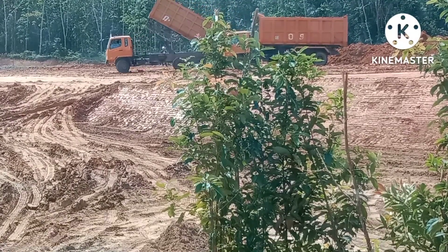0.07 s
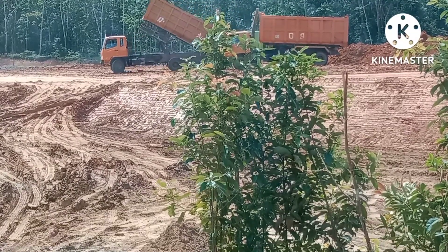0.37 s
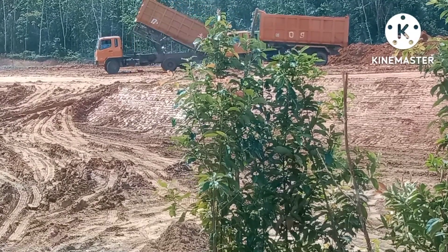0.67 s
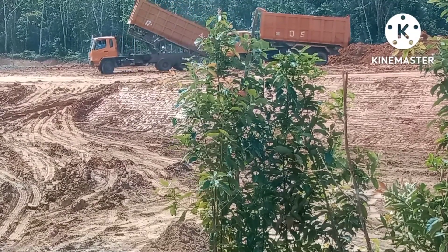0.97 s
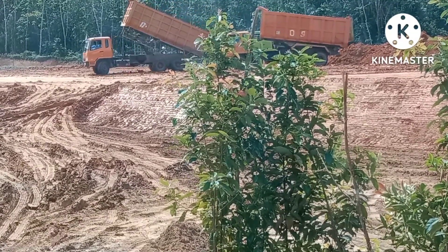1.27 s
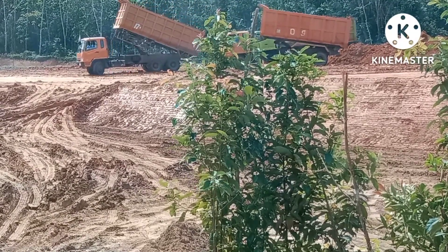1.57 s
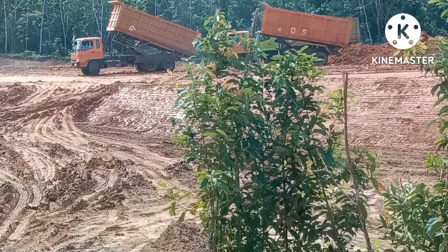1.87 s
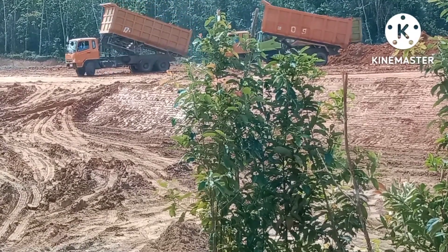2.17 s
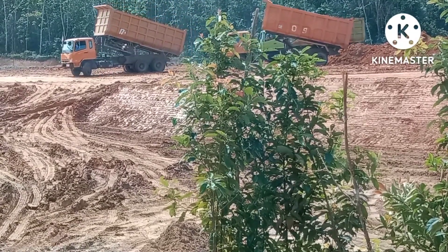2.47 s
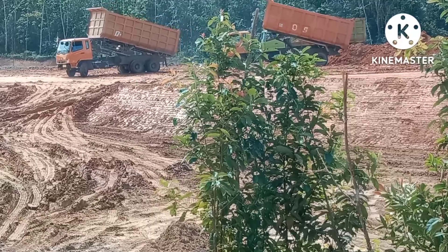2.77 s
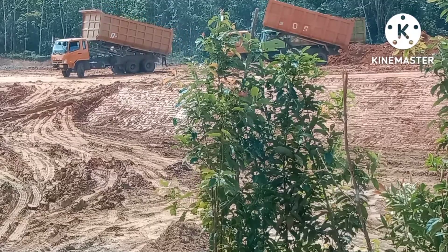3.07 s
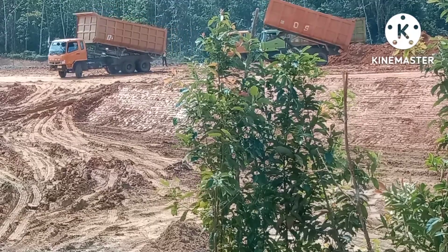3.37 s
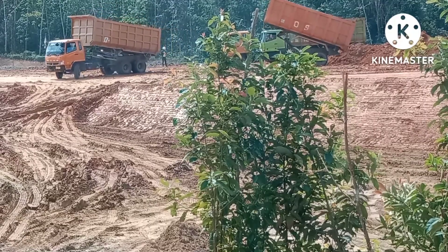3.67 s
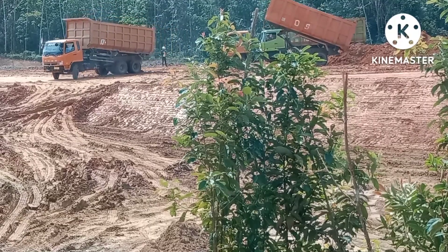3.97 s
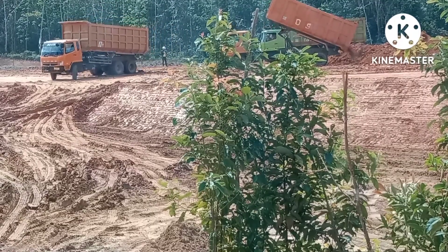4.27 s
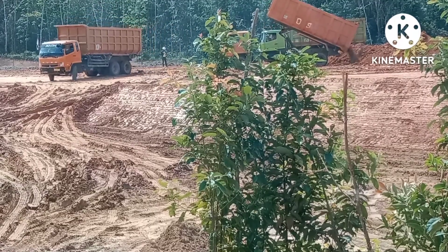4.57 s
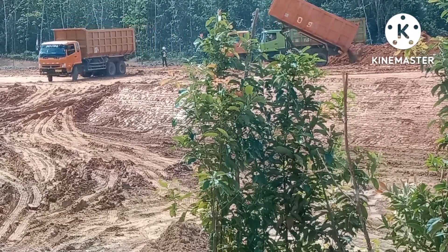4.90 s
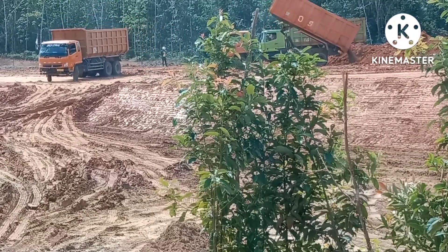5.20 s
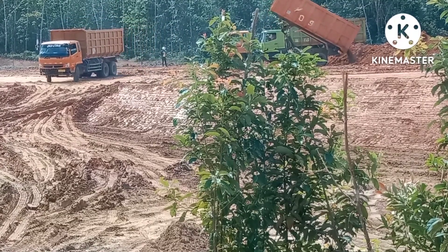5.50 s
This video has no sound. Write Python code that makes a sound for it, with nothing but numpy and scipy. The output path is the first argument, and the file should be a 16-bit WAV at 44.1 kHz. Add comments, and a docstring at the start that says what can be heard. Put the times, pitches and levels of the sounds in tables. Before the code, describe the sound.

Two diesel dump trucks are heard from a distance across an open earthwork site. From the start, one holds high revs to lift its bed, with a steady knocking drone and a gently pulsing pump whine. The other rolls along with a low rumble and a booming exhaust that throbs unevenly. Dull thuds of wheels in ruts come between about 1.3 and 3.7 seconds, and faint high ticks and small steel squeaks show from around 2 seconds. At 3.6 seconds brakes begin to drag with a thin squeal. Just after, the lifting truck's throttle closes and it sinks towards idle, growing quieter with a falling gear whine. From about 4 seconds to the end, near 5.6 seconds, short brake squeals, rubbing and metal squeaks recur over the other truck's continuing rumble. Very faint insects hiss high up throughout, with a brief trill around 2 seconds.

```python
"""Two diesel dump trucks on an earthwork site, heard from across the cut.
From the start one holds high revs to lift its bed, its pump whining amid faint high ticks, while the
other rolls away with a booming exhaust. Insects pulse faintly in the trees. Wheels thud into ruts and
steel squeaks on steel. At 3.6 s brake shoes begin to drag with a thin squeal; just after, the tipping
truck's throttle closes and it drops towards idle, its gear whine falling through the body's resonances."""
import sys
import numpy as np
from scipy import signal
from scipy.fft import rfft, irfft, next_fast_len
from scipy.io import wavfile
from scipy.ndimage import map_coordinates

SR = 44100
rng = np.random.default_rng(int(sys.argv[2]) if len(sys.argv) > 2 else 0)


def to_wav(sig):
    """Store sig (one row per channel, or 1-D mono) as 16-bit WAV at the path in sys.argv[1].

    Samples outside -1..1 are clipped; the rate is SR.
    """
    pcm = np.clip(np.atleast_2d(sig), -1, 1) * 32767
    pcm = np.round(pcm).astype(np.int16)
    wavfile.write(sys.argv[1], SR, pcm.T)  # frames by channels


N = 248724
T = np.arange(N) / SR
THROTTLE_OFF_S, CLOSING_S, COAST_S = 3.72, 0.072, 0.08

# Engine run-down: time_s, cycle_hz
REVS = [(3.79, 15.417), (3.9, 14.68), (4.01, 14.08), (4.13, 13.6), (4.31, 12.9), (4.5, 12.2), (4.9, 11.1),
        (5.2, 10.5), (5.64, 10.2)]
def tipping_truck():
    """One crankshaft drives engine, pump and gears; off throttle they slow and the truck quietens."""
    cycle_hz, = curves(REVS)
    cycles = np.cumsum(cycle_hz) / SR
    slowed = (cycle_hz[0] - cycle_hz) / np.ptp(cycle_hz)  # 0 lifting, 1 near idle
    knock_drop_db = -8 * ramp(THROTTLE_OFF_S, CLOSING_S) - 18.5 * slowed
    lope = undb(1.6 * slowed * np.sin(2 * np.pi * cycles))
    engine = (engine_tones(cycles, slowed, knock_drop_db)
              + lope * exhaust_roar(cycles, slowed)
              + lope * engine_block(cycles)
              + combustion_knock(cycles, knock_drop_db))
    return engine + hydraulic_pump(cycles) + gear_whine(cycles, cycle_hz) + high_ticks(slowed)


# Engine harmonics: cycle_multiple, level_db
HARMONICS = [(6, -32), (8, -34.5), (12, -37.5), (14, -36.5), (16, -32.5), (19, -43.5), (20, -38),
             (22, -45.5), (23, -50.5), (25, -48), (27, -50.5), (29, -52.5), (30, -48), (33, -49.5),
             (35, -52.5), (48, -60), (52, -59), (54, -54), (64, -59), (72, -57.5), (75, -58), (84, -60),
             (88, -57.5), (162, -64), (171, -62), (174, -57.5)]
def engine_tones(cycles, slowed, knock_drop_db):
    """Harmonics of the cycle rate fade with the revs; the high ones also die with the knock."""
    shift_db = -1.5 - 22 * slowed
    return sum(tone(order * cycles, db + shift_db + knock_drop_db * min((order / 50) ** 2, 1))
               for order, db in HARMONICS)


# Exhaust spectrum: freq_hz, gain_db
ROAR_SPECTRUM = [(100, -21.5), (160, 1.5), (220, -3), (260, -1.5), (300, -0.5), (345, -10), (450, -13),
                 (560, -15), (680, -34.5), (900, -38), (1500, -55), (5000, -100)]
def exhaust_roar(cycles, slowed):
    """Uneven firings pulse through the exhaust, softer as the revs fall."""
    pulses = clatter(cycles, repeat=0.18) * firings(cycles, decay=1.6, scatter_db=1.5, lumpy_db=1)
    return colour(pulses, ROAR_SPECTRUM) * undb(-28 - 10 * slowed)


# Block spectrum: freq_hz, gain_db
BLOCK_SPECTRUM = [(400, -21), (620, 3.5), (820, 2.5), (900, 1), (1100, 1), (1400, 0), (1620, -4),
                  (1850, -19), (2300, -37.5), (6000, -85)]
def engine_block(cycles, settle_s=1.28):
    """Near-even firings rattle the block, which settles once the crankshaft slows."""
    pulses = clatter(cycles, repeat=0.32) * firings(cycles, decay=5.2, scatter_db=0, lumpy_db=-0.1)
    return colour(pulses, BLOCK_SPECTRUM) * undb(-42 - 30.5 * ramp(THROTTLE_OFF_S + COAST_S, settle_s))


CYLINDERS_DB, KNOCK_DECAY_STROKES = [7, -2, 4, 3, 5, -4], 0.12
# Cylinder head spectrum: freq_hz, gain_db
KNOCK_SPECTRUM = [(1200, -38), (2020, -18), (2300, 0.5), (2700, 0.5), (3000, -12), (3400, -19.5),
                  (4200, -28.5), (9000, -68.5)]
def combustion_knock(cycles, drop_db, scatter_db=2.5):
    """A sharp blow from each cylinder in turn stands out of the head's constant ringing."""
    ringing = clatter(cycles, repeat=0.3)
    strokes = 6 * cycles
    firing = strokes.astype(int)
    blow_db = np.array(CYLINDERS_DB)[firing % 6] + scatter_db * rng.standard_normal(4096)[firing]
    blows = unit(1 + undb(blow_db) * np.exp(-(strokes % 1) / KNOCK_DECAY_STROKES))
    return colour(ringing * blows, KNOCK_SPECTRUM) * undb(-50 + drop_db)


def hydraulic_pump(cycles, order=26, beat_hz=1.065, beat_peak_s=1.88, fade_db_per_s=40.5):
    """The pump's whine swells about once a second and fades when the throttle closes."""
    beat = np.abs(1 + 0.3 * np.exp(2j * np.pi * beat_hz * (T - beat_peak_s)))
    level_db = -38.5 - fade_db_per_s * np.maximum(T - THROTTLE_OFF_S, 0)
    return beat * tone(order * cycles, level_db, fading_db=1.86)


# Gear tones: cycle_multiple, resonance_hz, level_db
GEAR_TONES = [(10, 140, -26), (11, 152, -27.5), (14, 210, -29), (16, 241, -32), (16, 208, -32),
              (17, 228, -31), (20, 280, -37.5), (24, 295, -38), (26, 384, -33), (26, 286, -37.5),
              (27, 340, -37.5), (32, 460, -39.5), (32, 390, -40.5), (36, 460, -44.5), (36, 400, -44),
              (52, 714, -49.5), (54, 678, -54), (52, 540, -54)]
def gear_whine(cycles, cycle_hz, shudder_hz=9, relative_width=0.034, attack_s=0.029):
    """On the overrun each rough gear tone stands out while it falls through a body resonance."""
    out = 0
    for order, hz, db in GEAR_TONES:
        shudder = np.cumsum(shudder_hz * drift(90)) / SR
        gear = tone(order * cycles + shudder, db, fading_db=-0.2) * unit(undb(2.5 * drift(70)))
        resonance = np.exp(-((order * cycle_hz / hz - 1) / relative_width) ** 2)
        out += gear * resonance
    return out * ramp(THROTTLE_OFF_S + COAST_S, attack_s)


# Tick pitches: ring_hz, level_db
TICK_RINGS = [(3050, -73.5), (3160, -70.5), (3240, -70.5), (3500, -76.5), (3700, -79), (3800, -80),
              (4200, -83.5), (4430, -82)]
def high_ticks(slowed, ticks_per_s=36, ring_s=0.0052, peak_s=2.3, fade_db_per_s=2.5):
    """Faint, quick, random ringing ticks at 3-4.5 kHz swell, then fade, further as the revs fall."""
    t = T[:SR // 10]
    out = 0
    for hz, db in TICK_RINGS:
        ticks = (rng.random(N) < ticks_per_s / SR) * undb(3 * noise())
        ring = t * np.exp(-t / ring_s) * np.sin(2 * np.pi * hz * t)
        out += undb(db) * unit(signal.fftconvolve(ticks, ring)[:N])
    return out * undb(3 - fade_db_per_s * np.abs(T - peak_s) - 14.5 * slowed)


# Rolling truck's engine: time_s, boom_hz, rumble_db, boom_db
DRIVE = [(0, 123.4, -26.5, -32), (.4, 119.6, -30, -34), (.62, 130.8, -26.5, -26.5), (.78, 115, -26.5, -27),
         (.9, 133.1, -30, -35), (1.1, 123, -26, -31), (1.35, 119.8, -25, -31), (1.6, 126.1, -25.5, -31.5),
         (1.95, 118.6, -27.5, -33.5), (2.25, 122, -28.5, -33.5), (2.5, 127, -25.5, -31),
         (3.1, 119, -27.5, -28), (3.5, 119.3, -24, -33), (3.66, 127.6, -23, -27.5),
         (3.75, 115.4, -32, -32.5), (4.05, 131.9, -28, -33.5), (4.18, 120.9, -27.5, -38),
         (4.3, 117, -27.5, -25), (4.4, 131.6, -34, -29), (4.48, 130.5, -30.5, -23.5),
         (4.7, 124.5, -27, -25.5), (4.95, 116.1, -28.5, -29.5), (5.3, 117.1, -28.5, -28.5),
         (5.64, 119, -29.5, -26.5)]
def rolling_truck(wander_hz=1.2, boom_order=10):
    """An engine at wandering revs drives the exhaust boom and the chassis rumble."""
    boom_hz, rumble_db, boom_db = curves(DRIVE)
    waves = np.cumsum(boom_hz + wander_hz * drift(11)) / SR
    cycles = waves / boom_order
    return exhaust_boom(waves, cycles, boom_db) + chassis_rumble(cycles) * undb(rumble_db)


# Exhaust throbs: peak_s, half_length_s, level_db
THROBS = [(0.121, 0.032, -23.5), (0.194, 0.02, -20.5), (.385, 0.012, -16.5), (.775, 0.017, -23),
          (0.897, .02, -20), (1.073, 0.01, -17.5), (1.133, 0.011, -23), (1.34, 0.022, -21),
          (1.64, 0.028, -18), (1.692, .022, -19), (1.844, 0.02, -23.5), (1.934, .018, -24),
          (2.725, 0.031, -20.5), (3.066, .018, -19), (3.133, .02, -22.5), (3.296, 0.021, -18),
          (3.367, 0.014, -25.5), (3.545, 0.021, -22.5), (3.676, .02, -25.5), (3.741, 0.028, -18.5),
          (4.008, 0.02, -21.5), (4.06, .018, -20.5), (4.61, 0.027, -27), (5.49, .02, -27.5)]
def exhaust_boom(waves, cycles, level_db):
    """The boom throbs now and then; the next lower engine order beats with it once a cycle."""
    steady = undb(level_db + drift(22))
    throbs = sum(undb(db) * bump(peak_s, half_s) for peak_s, half_s, db in THROBS)
    boom = np.hypot(steady, throbs) * np.sin(2 * np.pi * waves)
    lower_order = 0.3 * steady * np.sin(2 * np.pi * (waves - cycles))
    return np.sqrt(2) * (boom + lower_order)


# Chassis spectrum: freq_hz, gain_db
RUMBLE_SPECTRUM = [(20, -25), (42, -30), (54, -8), (68, -1), (85, 2.5), (110, 3.5), (135, 4.5), (160, -0.5),
                   (178, -11.5), (215, 2.5), (255, -10), (300, -8), (345, -14), (440, -14.5), (600, -30.5),
                   (1000, -56.5), (4000, -110)]
def chassis_rumble(cycles):
    """Uneven firings shake the chassis."""
    pulses = clatter(cycles, repeat=0.24) * firings(cycles, decay=0.64, scatter_db=1, lumpy_db=-0.5)
    return colour(pulses, RUMBLE_SPECTRUM)


# Chassis thuds: peak_s, pitch_hz, level_db
JOLTS = [(1.31, 85.7, -21), (1.41, 84, -30), (1.7, 83.7, -24), (2.08, 86, -29), (2.96, 81.2, -29),
         (3.55, 92, -24), (3.665, 85, -25.5)]
def rut_jolts(half_s=0.014):
    """Wheels drop into ruts: low thuds, blurred by distance."""
    return sum(tone(hz * T, db, fading_db=-3.9) * bump(peak_s, half_s) for peak_s, hz, db in JOLTS)


# Drum rub spectrum: freq_hz, gain_db
DRUM_SPECTRUM = [(800, -49.5), (1200, -13), (1370, 18.5), (1500, 7), (1620, -4), (1850, -29), (2200, -10),
                 (2480, -18), (2750, -23), (3500, -21.5), (8000, -70.5)]
# Shoe drags: start_s, length_s, rub_db, squeal_over_rub_db
DRAGS = [(3.6, 0.19, -61, 6), (4.178, 0.25, -56.5, 4.5), (4.553, 0.11, -57.5, -13), (4.807, 0.077, -61, 4),
         (4.94, 0.16, -68, 15), (5.133, 0.096, -57, -8), (5.27, 0.13, -59.5, -9), (5.44, 0.22, -64, -9.5)]
def brakes(squeal_hz=1473, groan_hz=1407, attack_s=0.012, release_s=0.069):
    """Dragging shoes rub the drum, which groans unsteadily and at times squeals, with a weak octave."""
    phase = 2 * np.pi * np.cumsum(squeal_hz + 14 * drift(140)) / SR
    squeal = unit((np.sin(phase) + undb(-26.5) * np.sin(2 * phase)) * undb(2 * drift(41)))
    groan_waves = np.cumsum(groan_hz + 53.3 * drift(9.3) + 30 * drift(250)) / SR
    groan = tone(groan_waves, db=-6) * unit(undb(2.5 * drift(90)))
    rub = colour(noise(), DRUM_SPECTRUM) * undb(2 * drift(40))
    out = 0
    for start_s, length_s, db, squeal_db in DRAGS:
        pressure = gate(start_s, length_s, attack_s, release_s)
        out += pressure * undb(db) * (rub + groan + undb(squeal_db) * squeal)
    return out


# Body and spring squeaks: peak_s, half_length_s, pitch_hz, glide_hz_per_s, level_db
SQUEAKS = [(2.0, 0.044, 4140, 5, -69), (2.034, 0.053, 3230, 3, -58.5), (2.095, .04, 3730, 1, -63),
           (2.351, 0.033, 3780, -3, -67), (2.583, .04, 3859, -6.5, -66), (2.62, 0.034, 3566, -0.5, -65),
           (2.7, 0.021, 4450, 0, -73), (2.779, 0.015, 4500, 0, -76), (3.72, 0.021, 3800, 2, -62.5),
           (3.808, 0.02, 3807, 0, -65), (3.81, 0.024, 3220, -5, -63), (3.9, .03, 3760, -5, -77),
           (4.05, 0.028, 1130, 1204, -51), (4.079, 0.039, 2526, 1204, -59), (4.2, 0.044, 2764, 7, -60.5),
           (4.322, 0.037, 3548, -4, -68.5), (4.327, 0.036, 1634, 3, -59), (4.426, 0.038, 2390, 1, -64.5),
           (4.519, 0.029, 3573, 0.5, -71), (4.543, 0.026, 556, 5, -45), (4.668, 0.031, 908, 0.5, -59),
           (4.73, 0.016, 1387, 8002, -54.5), (4.784, 0.043, 1636, -4, -62.5),
           (4.856, .025, 2250, -1500, -67.5), (4.86, 0.017, 587.7, 0.5, -52.5),
           (4.925, 0.048, 4420, 2, -76), (4.989, 0.028, 640, 1, -53), (5.012, .018, 2960, -3, -68),
           (5.041, 0.022, 2440, 798, -60), (5.099, 0.042, 3320, 8, -71.5), (5.109, 0.021, 2560, 2500, -63),
           (5.215, .035, 560, -2, -51), (5.277, .02, 1080, 0, -61), (5.335, .025, 575, -1, -53),
           (5.452, 0.027, 2110, -2, -67.5)]
def steel_squeaks(wobble_hz=28):
    """Steel slips on steel: a rough, narrow ring that swells, slides and stops."""
    wobble = np.cumsum(wobble_hz * drift(250)) / SR
    grain = np.sqrt(2) * unit(undb(2.5 * drift(120)))
    out = 0
    for peak_s, half_s, hz, glide, db in SQUEAKS:
        waves = hz * T + glide * (T - peak_s) ** 2 / 2 + wobble
        out += undb(db) * bump(peak_s, half_s) * np.sin(2 * np.pi * waves)
    return grain * out


# Insect hiss spectrum: freq_hz, gain_db
INSECT_SPECTRUM = [(5500, -47), (6300, -10.5), (6550, -1.5), (7000, -4.5), (7450, -7), (7750, 7),
                   (8100, -2.5), (8300, 4), (8600, -3.5), (9000, -16.5), (9600, -42.5)]
def insect_hiss(peak_s=3.2, rise_db_per_s=0.35, fade_db_per_s=3, throb_hz=10.8):
    """A high, speckled insect hiss throbs quickly as it slowly swells and fades."""
    level_db = -75 - np.maximum(rise_db_per_s * (peak_s - T), fade_db_per_s * (T - peak_s))
    throb_db = 1.2 * np.sin(2 * np.pi * np.cumsum(throb_hz + 1.2 * drift(2.8)) / SR)
    speckled_hiss = blips(6100, 9100, count=4000) + 0.8 * noise()
    return colour(speckled_hiss, INSECT_SPECTRUM) * undb(level_db + throb_db)


# Trills: start_s, length_s, pitch_hz, level_db
TRILLS = [(0, .55, 10780, -92), (1.71, .86, 7843, -76.5), (4.82, 0.11, 8450, -77.5)]
def insect_trills(spread_hz=90, edge_s=0.03):
    """Nearer insects trill now and then, each around one pitch."""
    return sum(undb(db) * gate(start_s, length_s, edge_s, edge_s)
               * blips(hz - spread_hz, hz + spread_hz, count=400)
               for start_s, length_s, hz, db in TRILLS)


# Site spectrum: freq_hz, gain_db
SITE_SPECTRUM = [(100, -1), (550, -4.5), (950, -12), (1400, 5), (1900, -8.5), (2450, -9.5), (3200, -13),
                 (4400, -17), (5000, -24.5), (9000, -62)]
def distant_machinery():
    """Far machines merge into a wavering wash."""
    return colour(noise(), SITE_SPECTRUM) * undb(-64.5 + 1.3 * drift(20))


# Hiss spectrum: freq_hz, gain_db
HISS_SPECTRUM = [(100, 15.5), (1000, 3), (2000, -19.5), (4000, -8.5), (6000, -12), (9500, -21),
                 (15000, -26)]
def steady_hiss():
    """A smooth, steady hiss."""
    return colour(noise(), HISS_SPECTRUM) * undb(-68.5)


# Flicker depth: freq_hz, spread_db
FLICKER_DEPTH = [(400, 0), (700, 2.5), (1400, 2), (1900, 5.5), (2600, 1.5), (3400, 4.5), (4400, 3.5),
                 (5500, 1.5), (7000, 5), (8200, 7)]
def flicker(x, rate_hz=30, patch_hz=108.64):
    """Narrow patches of the spectrum swell and fade on their own, mostly in the treble."""
    frames = dict(fs=SR, nperseg=1024, noverlap=768)
    hz, t, spectrum = signal.stft(x, boundary="odd", **frames)
    grid = np.meshgrid(hz / patch_hz, t * rate_hz, indexing="ij")
    patches = unit(map_coordinates(rng.standard_normal((400, 200)), grid, order=3, mode="wrap"))
    spread_db = np.interp(hz, *np.transpose(FLICKER_DEPTH))[:, None]
    gain = undb(spread_db * patches - spread_db ** 2 * np.log(10) / 20)  # keeps the mean power
    return signal.istft(spectrum * gain, **frames)[1][:N]


def firings(cycles, decay, scatter_db, lumpy_db):
    """Six cylinders fire in turn, one side louder; each blow dies away over `decay` strokes."""
    strokes = 6 * cycles
    firing = strokes.astype(int)
    blow_db = scatter_db * rng.standard_normal(4096)[firing] + lumpy_db * np.cos(2 * np.pi * firing / 6)
    return unit(undb(blow_db) * np.exp(-(strokes % 1) / decay))


def clatter(cycles, repeat, size=2048):
    """Rattle whose power share `repeat` comes back alike on every engine cycle."""
    pattern = unit(irfft(np.exp(2j * np.pi * rng.random(size // 2 + 1))))
    alike = map_coordinates(pattern, [cycles % 1 * size], order=3, mode="wrap")
    return np.sqrt(repeat) * alike + np.sqrt(1 - repeat) * noise()


def blips(low_hz, high_hz, count, mean_half_s=0.0078):
    """Tiny tone bursts at random moments and pitches; rms 1."""
    t = T[:SR // 10]
    out = np.zeros(N + len(t))
    for (when, pitch, length), db in zip(rng.random((count, 3)), 3 * rng.standard_normal(count)):
        start = int(when * N)
        hz = low_hz + (high_hz - low_hz) * pitch
        shape = np.exp(-((t - t.mean()) / (mean_half_s * (0.5 + length))) ** 2)
        out[start:start + len(t)] += undb(db) * shape * np.sin(2 * np.pi * hz * t)
    return unit(out[len(t) // 2:][:N])


def tone(waves, db, fading_db=1.5):
    """A sine that swells and fades in moving air."""
    return undb(db + fading_db * drift(3.655)) * np.sqrt(2) * np.sin(2 * np.pi * (waves + rng.random()))


def colour(x, response):
    """Filter by (freq_hz, gain_db) points; rms 1."""
    hz, db = np.transpose(response)
    size = next_fast_len(N + SR // 4)
    bins_hz = np.maximum(np.arange(size // 2 + 1) * SR / size, 1)
    gain = undb(np.interp(np.log(bins_hz), np.log(hz), db))
    return unit(irfft(rfft(x, size) * gain, size)[:N])


def drift(rate_hz):
    """Smooth random drift; rms 1."""
    coarse_s = T[::32]
    path = map_coordinates(rng.standard_normal(2048), [coarse_s * rate_hz], order=3, mode="wrap")
    return unit(np.interp(T, coarse_s, path))


def curves(table):
    """The columns of a time table, one value a sample."""
    time_s, *columns = np.transpose(table)
    return [np.interp(T, time_s, column) for column in columns]


def ramp(start_s, length_s):
    """Linear rise from 0 to 1, then hold."""
    return np.clip((T - start_s) / length_s, 0, 1)


def gate(start_s, length_s, attack_s, release_s):
    """Rise, hold, fall."""
    return ramp(start_s, attack_s) * (1 - ramp(start_s + length_s, release_s))


def bump(peak_s, half_s):
    """Bell-shaped envelope."""
    return np.exp(-((T - peak_s) / half_s) ** 2)


def noise():
    """White noise."""
    return rng.standard_normal(N)


def undb(db):
    """Decibels to gain."""
    return 10 ** (np.asarray(db) / 20)


def unit(x):
    """Scale to rms 1."""
    return x / np.sqrt(np.mean(x ** 2))


def scene():
    """Both trucks and the insects over the wash of the open site; mono."""
    site, hiss = distant_machinery(), steady_hiss()
    machines = flicker(tipping_truck() + rolling_truck() + rut_jolts() + brakes() + site)
    return (machines + steel_squeaks() + insect_hiss() + insect_trills() + hiss)[None]


def record(dry, fade_in_s=0.008, cutoff_hz=15460):
    """A brief fade-in and a steep low-pass."""
    lowpass = signal.ellip(8, 0.2, 70, cutoff_hz, fs=SR, output="sos")
    return signal.sosfilt(lowpass, dry * ramp(0, fade_in_s))


dry = scene()
out = record(dry)
to_wav(out)
```